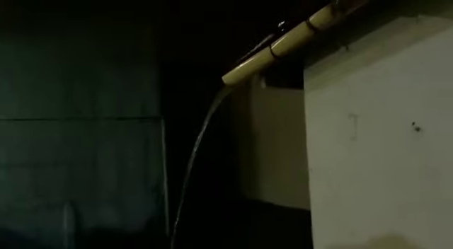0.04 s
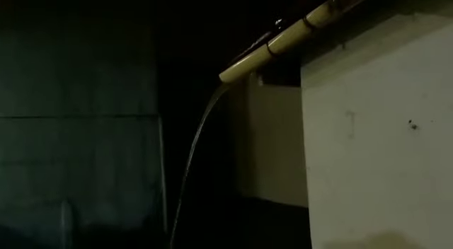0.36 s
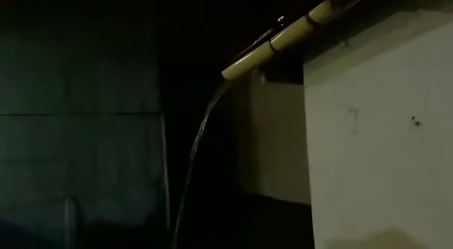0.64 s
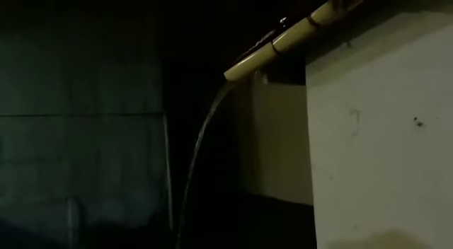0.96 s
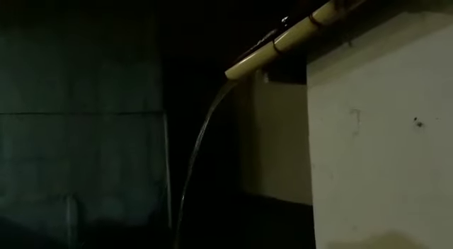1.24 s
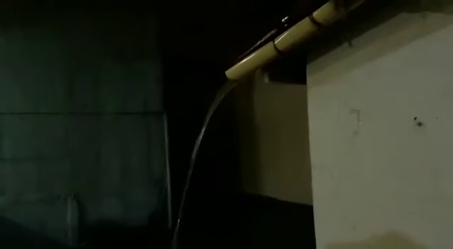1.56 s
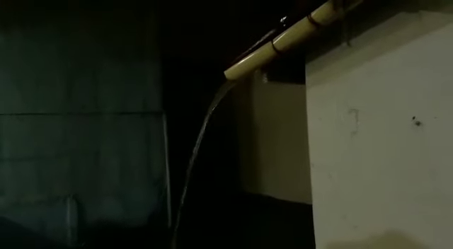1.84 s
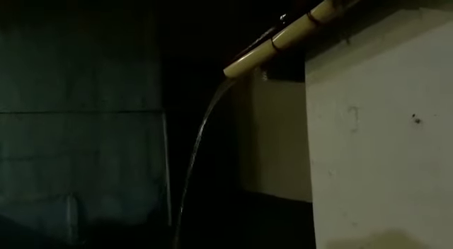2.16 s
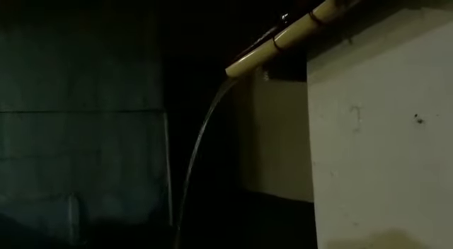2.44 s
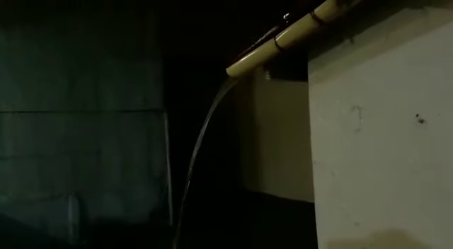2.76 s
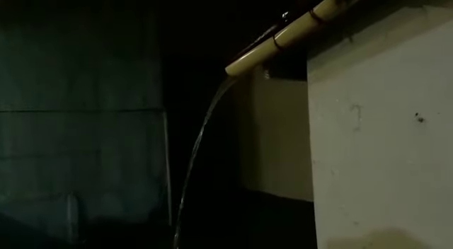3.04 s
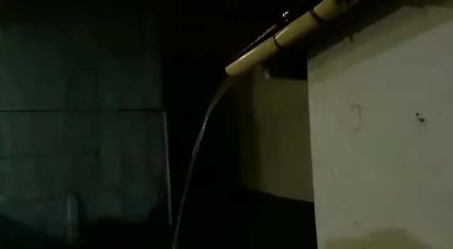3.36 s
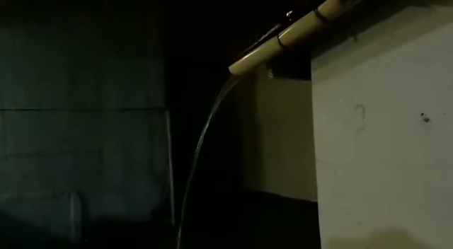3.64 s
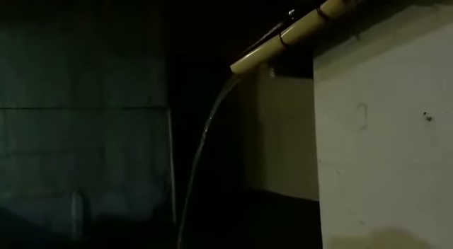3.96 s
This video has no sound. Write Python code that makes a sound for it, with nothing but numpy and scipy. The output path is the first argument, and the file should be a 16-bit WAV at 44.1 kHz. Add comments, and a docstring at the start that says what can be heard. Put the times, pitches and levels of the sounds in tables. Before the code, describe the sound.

Water falls from a roof spout and hits wet ground close by in quick, uneven slaps with small splashes and bubbling. Steady rain hisses behind it throughout, and a few near drops tick on hard surfaces in the yard.

```python
"""Water slaps unevenly onto wet ground, falling from a roof spout into a yard in dense night rain.
The stream breaks into lumps: each impact is a heavily damped pulse followed by a spray of droplets,
over small splashes and ringing bubbles. A close wall echoes the stream and the yard reverberates.
Nearby raindrops tick on hard surfaces, while countless distant ones merge into a wash."""
import sys
import numpy as np
from scipy import signal
from scipy.fft import rfft, irfft
from scipy.io import wavfile

SR = 44100
rng = np.random.default_rng(int(sys.argv[2]) if len(sys.argv) > 2 else 0)


def pcm_store(signal):
    """Save signal as 16-bit PCM."""
    levels = np.round(np.clip(np.atleast_2d(signal), -1, 1) * 32767)
    wavfile.write(sys.argv[1], SR, levels.astype(np.int16).T)


N = 176400
TIME = np.arange(N) / SR

# Lumps of water landing: start_s, level_db, pitch_hz, spray_offset_db
WATER_LUMPS = [(0.0362, -12, 1770, -13), (0.0562, -10.5, 2250, -11), (0.2093, -10.5, 1400, -12),
               (0.2635, -9, 2240, -13), (0.3502, -6, 2180, -12), (0.4293, -5, 2200, -11),
               (0.5266, -12, 1390, -12), (0.5826, -6, 2260, -12.5), (0.7235, -17, 2190, -11),
               (0.7526, -7, 2270, -13), (0.82, -6.5, 2010, -11.5), (0.8809, -15, 2450, -11),
               (0.9617, -8, 2900, -18), (0.9921, -9.5, 2940, -9.5), (1.035, -10, 2270, -21),
               (1.0829, -17, 2690, -13), (1.1252, -11, 2230, -9), (1.1798, -9.5, 1760, -13),
               (1.248, -9, 2240, -15), (1.3926, -4, 2210, -14), (1.4536, -11, 2120, -6),
               (1.6153, -5, 2800, -15), (1.6796, -13, 2540, -9), (1.704, -15, 2690, -15),
               (1.7525, -13, 2760, -9), (1.8567, -7, 1980, -18), (1.8895, -11, 1570, -10),
               (1.916, -7.5, 1510, -13), (1.9849, -5, 2230, -11), (2.0208, -6, 2760, -10),
               (2.1846, -14.5, 2510, -9), (2.2265, -5.5, 2190, -14), (2.3191, -7, 2220, -19),
               (2.3595, -4.5, 2180, -10), (2.381, -15, 2670, 1.5), (2.4982, -10, 2200, -15),
               (2.5421, -4.5, 2700, -7), (2.582, -7, 2240, -15), (2.6647, -12, 2980, -3),
               (2.719, -9.5, 3050, -17), (2.7794, -13, 2260, -9), (2.9517, -6.5, 1500, -21),
               (2.9792, -7.5, 2270, -15), (3.0609, -4, 2440, -10), (3.0899, -6.5, 2680, -7),
               (3.1768, -9.5, 2240, -11), (3.2692, -18, 2230, -8), (3.2935, -10, 2570, -6),
               (3.3435, -6, 2630, -5.5), (3.4458, -9, 1260, -8), (3.5169, -15, 2810, -12),
               (3.5547, -6, 1500, -19), (3.76, -11, 2460, -17), (3.7913, -11.5, 2730, -8),
               (3.8157, -9, 2290, -10), (3.8987, -5.5, 2670, -8.5)]
# Strength of the stream: time_s, level_db
STREAM_FLOW = [(0.03, -26), (0.04, -30), (0.13, -32.5), (0.4, -24.5), (1.84, -25), (2.02, -21.5),
               (2.08, -25.5), (2.4, -20.5), (2.47, -26.5), (2.56, -19.5), (2.83, -26), (3.1, -22.5),
               (3.31, -21.5), (3.35, -21), (3.49, -24), (3.89, -23), (3.9, -22), (3.97, -23)]
# Filter for the small splashes: frequency_hz, gain_db
PATTER_SPECTRUM = [(400, -35.5), (800, -8), (1300, -10), (1800, -2), (2300, 3.5), (2800, 3.5),
                   (3600, -10.5), (5000, -10.5), (9000, -47)]
# The closest raindrops: start_s, level_db
NEAR_DROPS = [(0.219, -18), (0.2707, -19), (0.358, -18), (0.5267, -19), (0.9467, -15.5), (1.0869, -20),
              (1.1503, -19), (1.8347, -15), (2.0415, -10.5), (2.4139, -19), (2.472, -23), (2.5016, -21),
              (2.6592, -17), (3.239, -17), (3.318, -16.5), (3.7333, -16)]
# Filter for drops on hard surfaces: frequency_hz, gain_db
TICK_SPECTRUM = [(500, -22.5), (1500, -5), (3000, 3), (5000, -2.5), (8000, 0), (9200, 0.5), (10000, 5),
                 (11200, -1.5), (13000, -3), (14500, 1.5), (16000, -5.5)]
# Filter for the distant rain: frequency_hz, gain_db
WASH_SPECTRUM = [(25, -38), (55, -33), (75, -14), (110, -4.5), (200, -1.5), (290, 1.5), (400, 0.5),
                 (520, 2), (800, 1), (1400, 2), (2500, 3), (3600, 1.5), (5200, -8.5), (8500, -6),
                 (10000, -4), (12000, -6), (16000, -15)]

SLAP_DB, SLAP_Q, SLAP_DELAY_S, SLAP_BAND_HZ = 3.5, 2.3, 0.000898, (810, 4260)
SPRAY_PER_S, SPRAY_RISE_S, SPRAY_DECAY_S, SPRAY_DB, MIST_DB = 900, 0.0034, 0.026, -3, -19.5
PATTER_PER_S, PATTER_DB = 1100, -3
BUBBLES_PER_S, BUBBLE_CYCLES, BUBBLE_DB = 110, 20, -8
WALL_ECHO_S, WALL_ECHO_DB = 0.00405, -10.5
YARD_T60_S, YARD_DB = 0.24, -12.5
TICKS_PER_S, TICK_DECAY_S, TICK_DB, NEAR_DROP_DB = 650, 0.0012, -30, 9
WASH_DB = -27.5
CUTOFF_HZ = 15950


def slaps(size=6000):
    """Impact excitation: each lump drives a damped resonance, then sprays droplets near that pitch."""
    out, t = np.zeros(N), TIME[:size]
    band = signal.butter(2, SLAP_BAND_HZ, "band", fs=SR, output="sos")
    push = signal.sosfilt(band, (t == 0) + 1e-18)
    envelope = np.exp(-t / SPRAY_DECAY_S) * (1 - np.exp(-t / SPRAY_RISE_S))
    for start_s, level_db, pitch_hz, spray_offset_db in WATER_LUMPS:
        ring = resonate(push, pitch_hz, SLAP_Q)
        slap = from_db(SLAP_DB) * ring / np.abs(ring).max()
        landings = rng.random(size) < SPRAY_PER_S / SR
        droplets = landings * rng.uniform(0.36, 1, size) * rng.choice([-1, 1], size)
        splash = unit_rms(resonate(signal.sosfilt(band, droplets), pitch_hz, q=1.5))
        mist = from_db(MIST_DB) * unit_rms(droplets)
        spray = from_db(SPRAY_DB + spray_offset_db) * envelope * (splash + mist)
        add(out, start_s + SLAP_DELAY_S, from_db(level_db) * (slap + spray))
    return out


def stream():
    """Damped oscillation: small splashes and bubbles ring briefly, swelling with the flow."""
    splashes = impacts(PATTER_PER_S * from_db(3 * drift(25)), spread_db=4)
    patter = ring_clicks(splashes, low_hz=900, high_hz=4500, q=2.15)
    patter = unit_rms(colour(patter, PATTER_SPECTRUM))
    births = impacts(BUBBLES_PER_S, spread_db=6)
    bubble_q = BUBBLE_CYCLES * np.pi / np.log(1000)  # 60 dB of decay in that many cycles
    bubbles = ring_clicks(births, low_hz=1522, high_hz=3590, q=bubble_q, count=28)
    flow_db = np.interp(TIME, *np.transpose(STREAM_FLOW))
    return from_db(flow_db) * (from_db(PATTER_DB) * patter + from_db(BUBBLE_DB) * bubbles)


def wall_echo(x):
    """Specular reflection: a close wall returns a delayed, weaker copy."""
    return from_db(WALL_ECHO_DB) * np.interp(TIME - WALL_ECHO_S, TIME, x, left=0)


def yard_reverb(x):
    """Reverberation: scattered reflections between the house walls decay exponentially."""
    echoes = (rng.random(N) < 1500 / SR) * rng.standard_normal(N)
    echoes *= from_db(-60 * TIME / YARD_T60_S) * (TIME > 0.006)
    return from_db(YARD_DB) * signal.fftconvolve(x, echoes / np.sqrt(np.sum(echoes ** 2)))[:N]


def raindrops(size=400):
    """Brief impacts have broad spectra: drops tick on hard wet surfaces, and the closest crackle."""
    clicks = impacts(TICKS_PER_S * from_db(3.7 * drift(25)), spread_db=2.5)
    energy = signal.lfilter([1], [1, -np.exp(-2 / (TICK_DECAY_S * SR))], clicks ** 2 + 1e-18)
    bursts = np.sqrt(energy) * rng.standard_normal(N)
    ticks = unit_rms(bursts) + from_db(-15) * ring_clicks(clicks, low_hz=3000, high_hz=14000, q=1.5)
    near = np.zeros(N)
    for start_s, level_db in NEAR_DROPS:
        crackle = rng.standard_normal(size) * np.exp(-TIME[:size] / 0.0017)
        add(near, start_s + 0.00069, from_db(level_db + NEAR_DROP_DB) * crackle / np.abs(crackle).max())
    return from_db(TICK_DB) * unit_rms(colour(ticks, TICK_SPECTRUM)) + colour(near, TICK_SPECTRUM)


def far_rain():
    """Incoherent summation: countless distant drops merge into nearly steady noise."""
    return from_db(WASH_DB + 0.29 * drift(8.6)) * unit_rms(colour(rng.standard_normal(N), WASH_SPECTRUM))


def impacts(per_s, spread_db):
    """Poisson process: independent clicks, many small and a few large."""
    arrivals = rng.random(N) < per_s / SR
    level_db = spread_db * np.minimum(rng.exponential(1, N), 3.4)
    return arrivals * from_db(level_db) * rng.choice([-1, 1], N)


def resonate(x, hz, q):
    """Second-order resonance with unit gain at its peak."""
    return signal.lfilter(*signal.iirpeak(hz, max(q, 0.5), fs=SR), x + 1e-18)


def ring_clicks(clicks, low_hz, high_hz, q, count=16):
    """Impulse response: each click excites one resonator, drawn at random from a bank."""
    chosen = rng.integers(0, count, N)
    pitches_hz = np.geomspace(low_hz, high_hz, count)
    return unit_rms(sum(resonate(clicks * (chosen == k), hz, q) for k, hz in enumerate(pitches_hz)))


def drift(corner_hz, hop=40):
    """Low-passed noise: a slow fluctuation of unit power."""
    pole = np.exp(-2 * np.pi * corner_hz * hop / SR)
    noise = rng.standard_normal(N // hop + 2002)
    settled = signal.lfilter([1], [1, -2 * pole, pole * pole], noise)[2000:]
    return np.interp(np.arange(N) / hop, np.arange(len(settled)), unit_rms(settled))


def colour(x, spectrum):
    """Minimum-phase filtering: folding the cepstrum makes the response causal."""
    hz, db = np.transpose(spectrum)
    grid_hz = np.maximum(np.arange(N + 1) * SR / (2 * N), 1)
    gain = from_db(np.interp(np.log(grid_hz), np.log(hz), db))
    cepstrum = irfft(np.log(gain))
    cepstrum[1:N] *= 2
    cepstrum[N + 1:] = 0
    return irfft(rfft(x, 2 * N) * np.exp(rfft(cepstrum)))[:N]


def from_db(db):
    """Decibels to amplitude ratio."""
    return 10 ** (np.asarray(db) / 20)


def unit_rms(x):
    """Normalisation to unit power."""
    return x / np.sqrt(np.mean(x ** 2) + 1e-20)


def add(out, start_s, sound):
    """Superpose a sound at its start time."""
    i = int(np.clip(start_s * SR, 0, N - 1))
    out[i:i + len(sound)] += sound[:N - i]


def scene():
    """Superposition: the spout, its reflections and the rain add in one channel."""
    spout = slaps() + stream()
    spout += wall_echo(spout)
    spout += yard_reverb(spout)
    return (from_db(-2) * spout + raindrops() + far_rain())[None]


def record(dry):
    """Band limiting: a steep low-pass removes the highest treble."""
    return signal.sosfilt(signal.ellip(12, 0.1, 80, CUTOFF_HZ, fs=SR, output="sos"), dry)


dry = scene()
out = record(dry)
pcm_store(out)
```